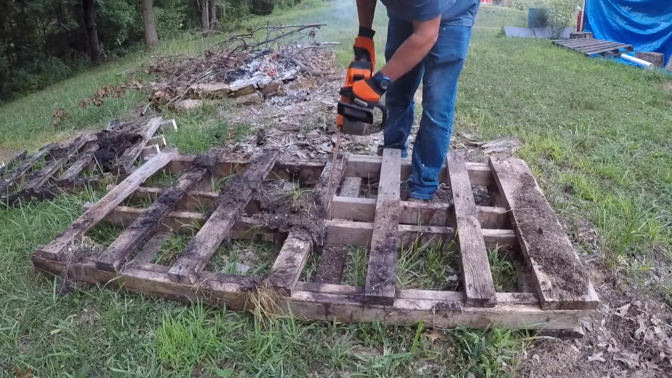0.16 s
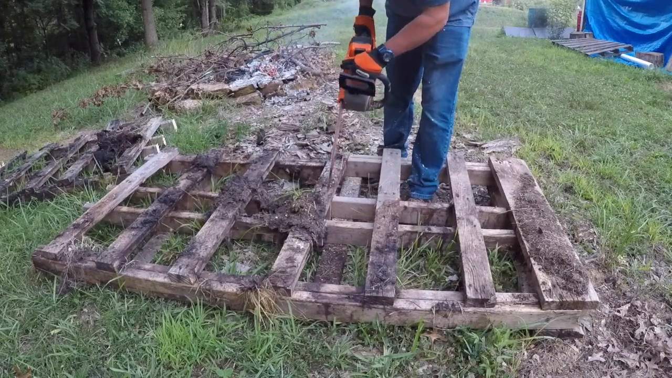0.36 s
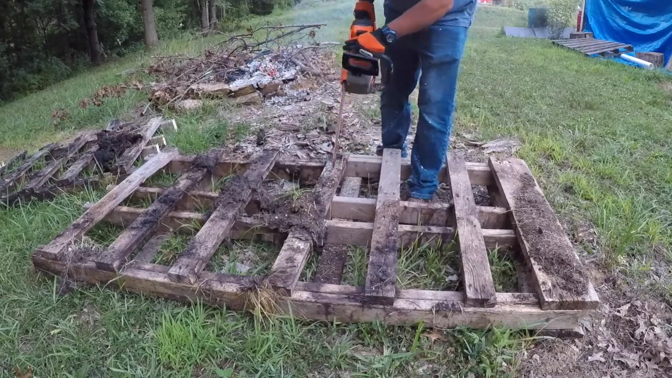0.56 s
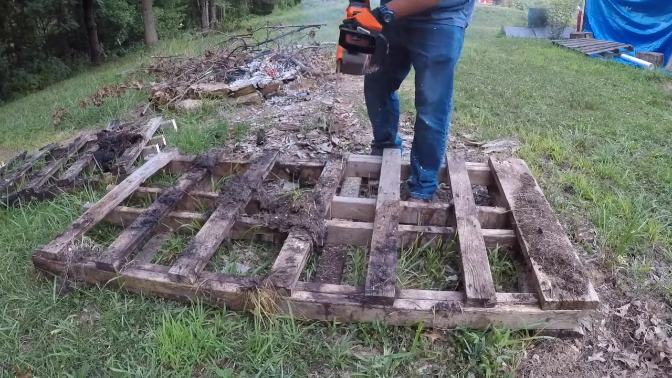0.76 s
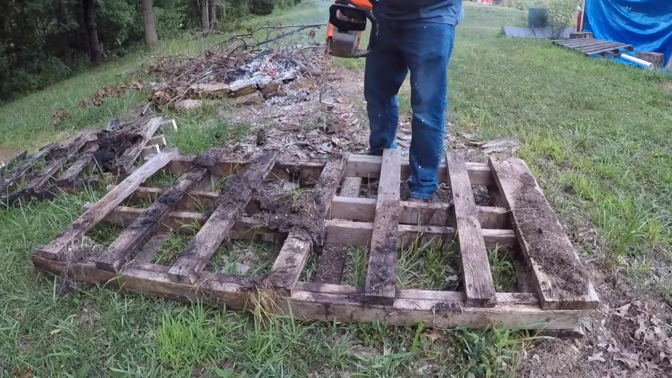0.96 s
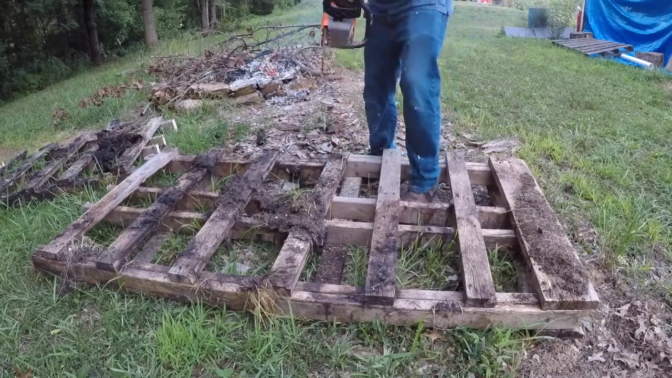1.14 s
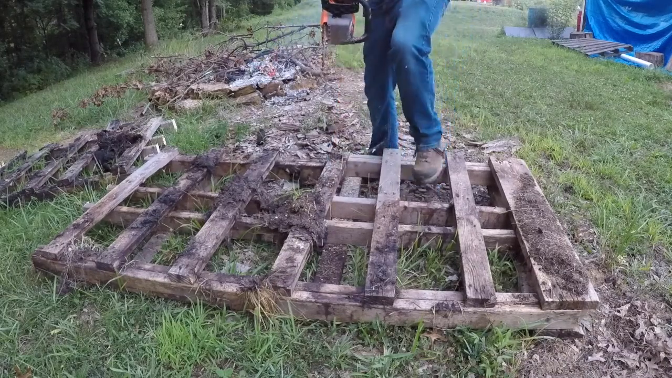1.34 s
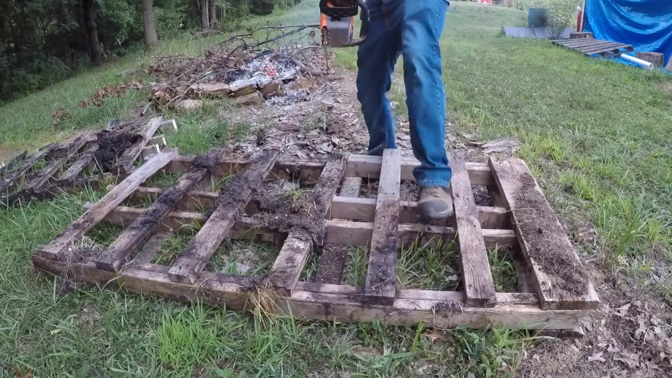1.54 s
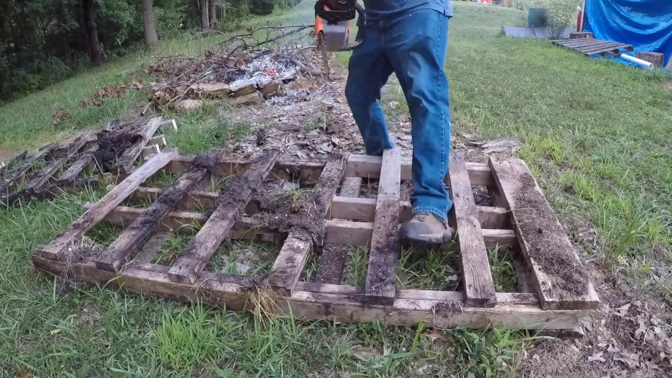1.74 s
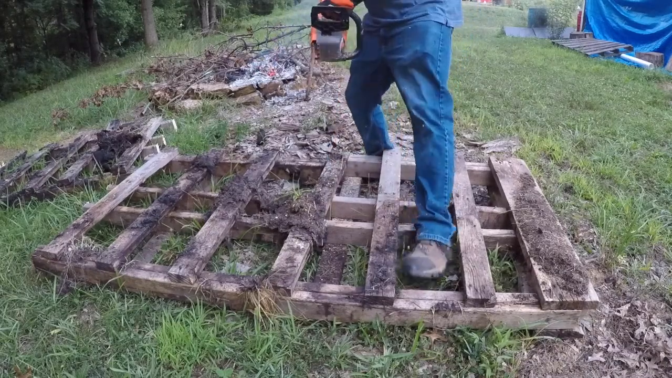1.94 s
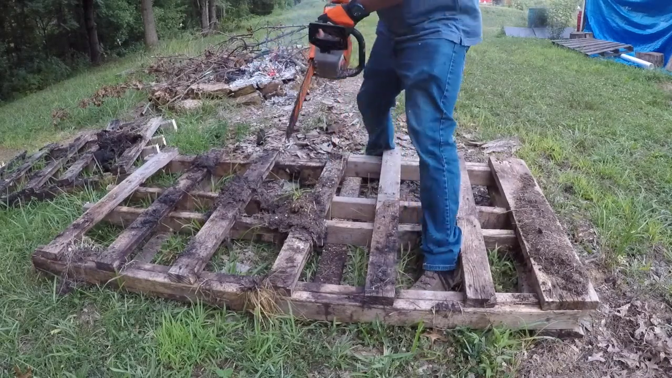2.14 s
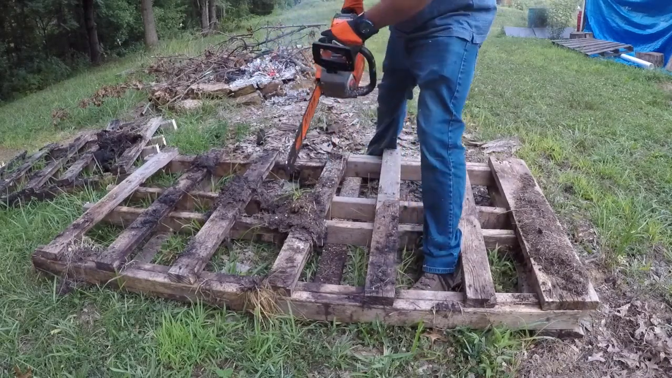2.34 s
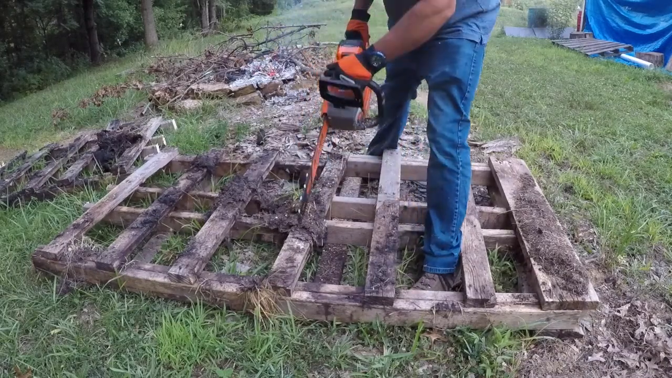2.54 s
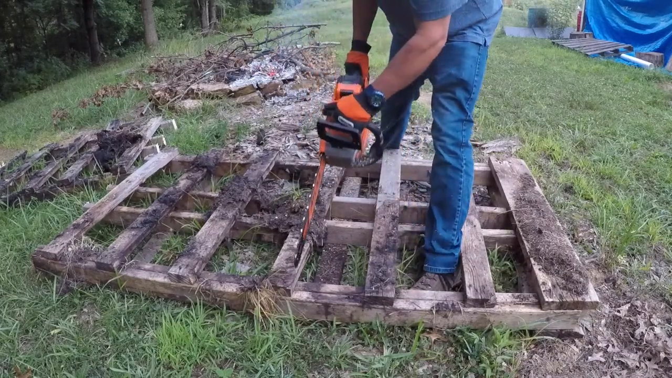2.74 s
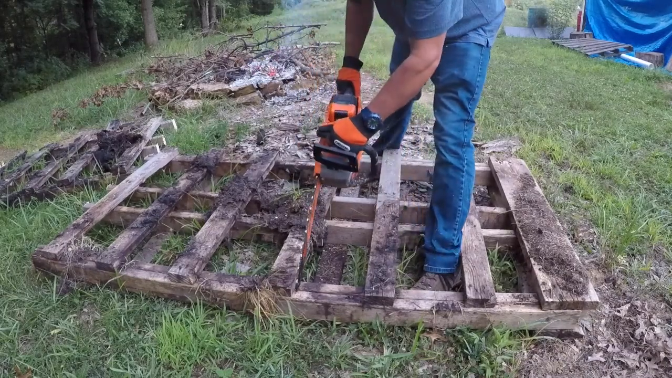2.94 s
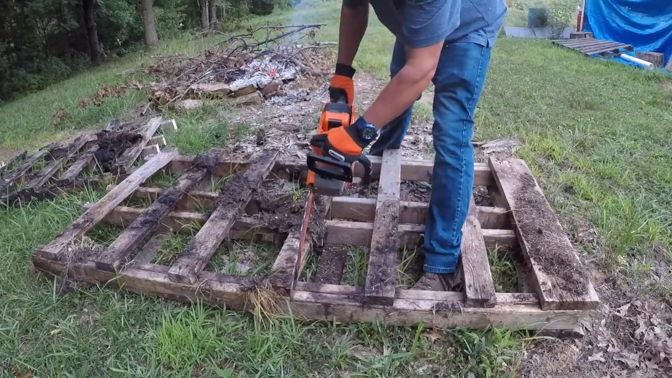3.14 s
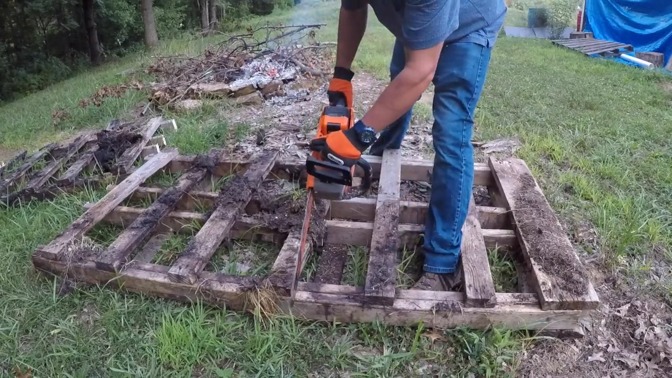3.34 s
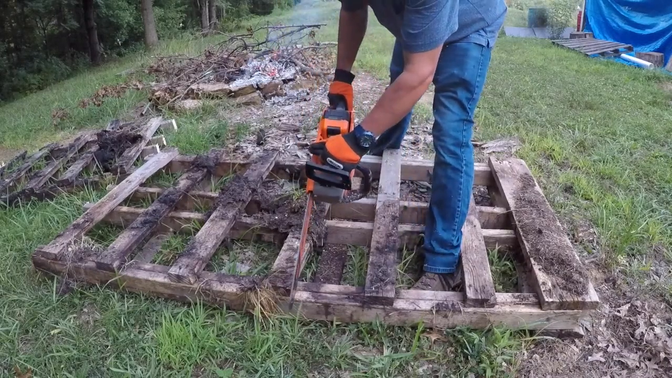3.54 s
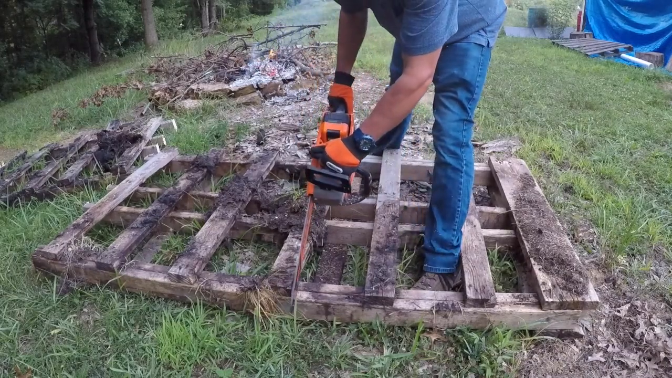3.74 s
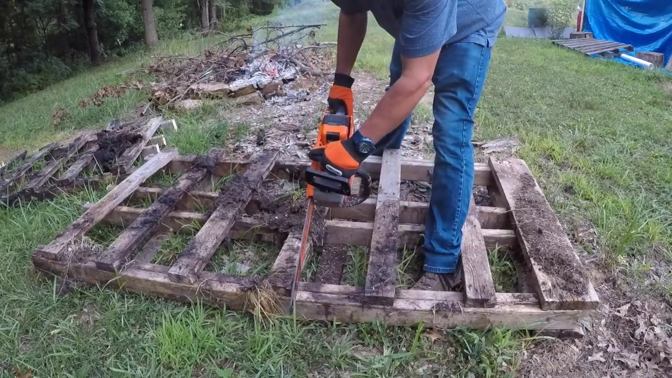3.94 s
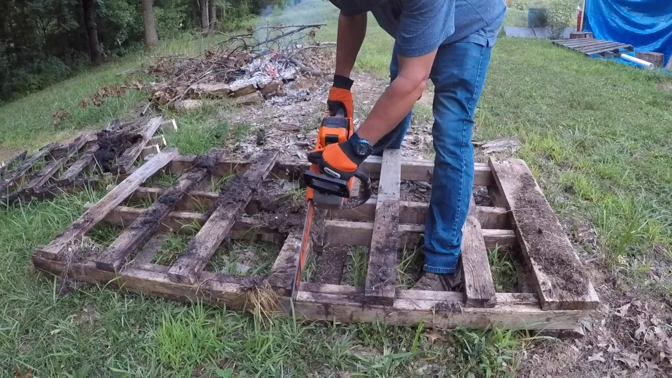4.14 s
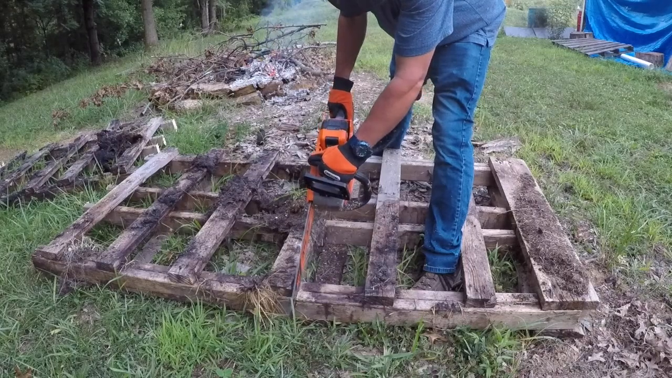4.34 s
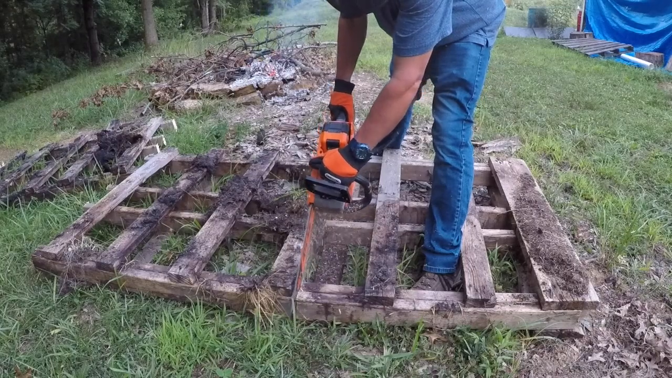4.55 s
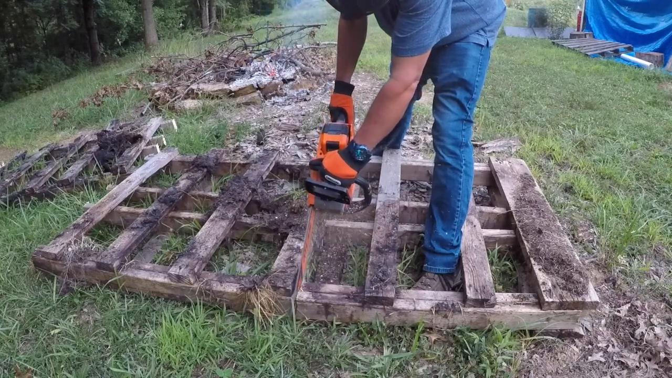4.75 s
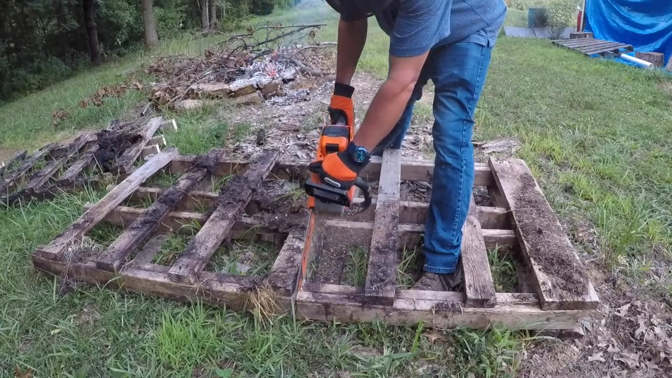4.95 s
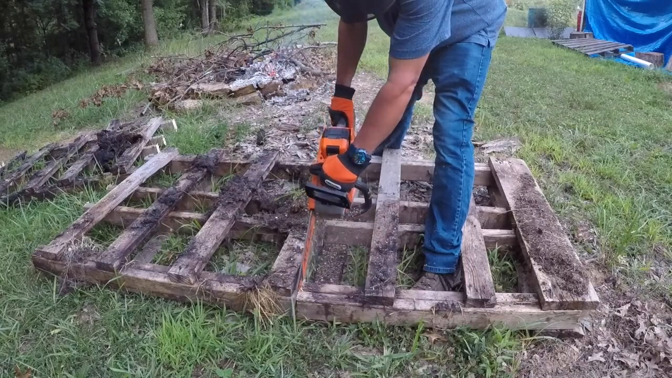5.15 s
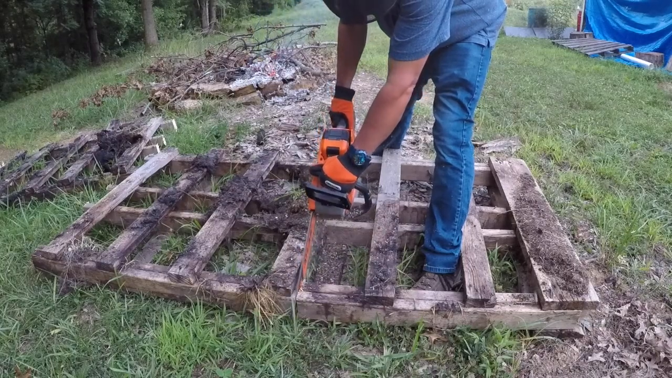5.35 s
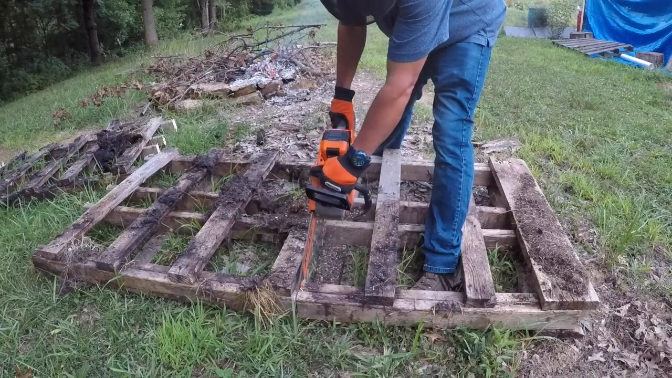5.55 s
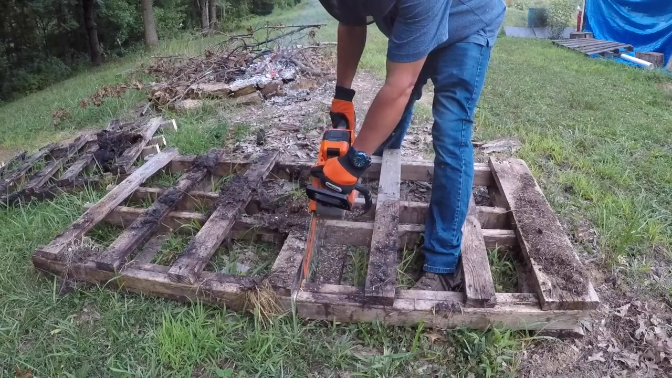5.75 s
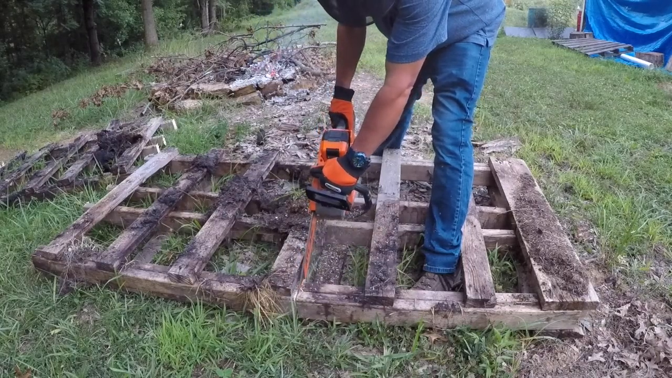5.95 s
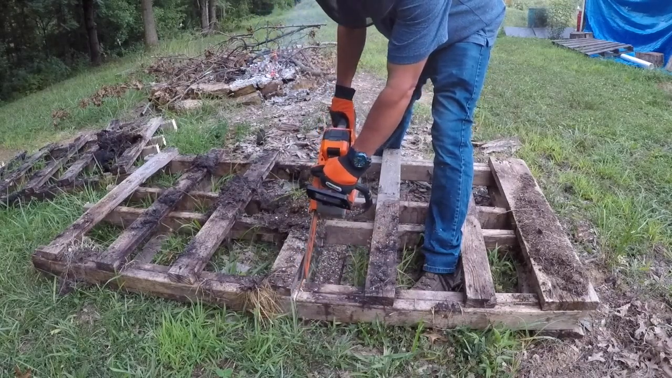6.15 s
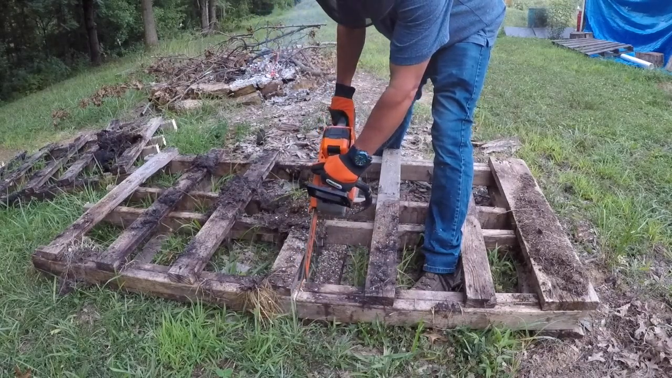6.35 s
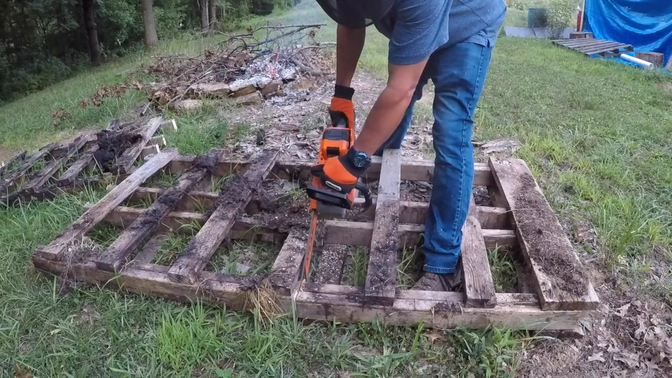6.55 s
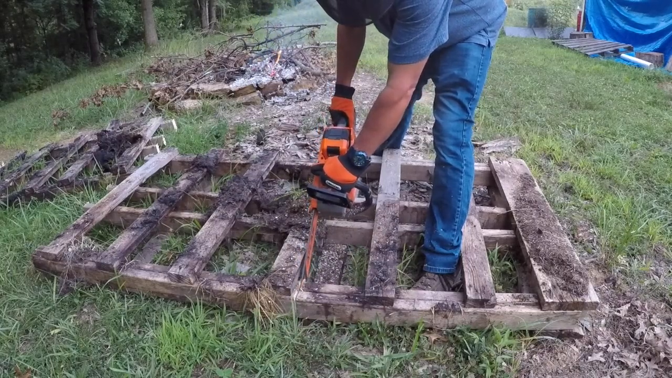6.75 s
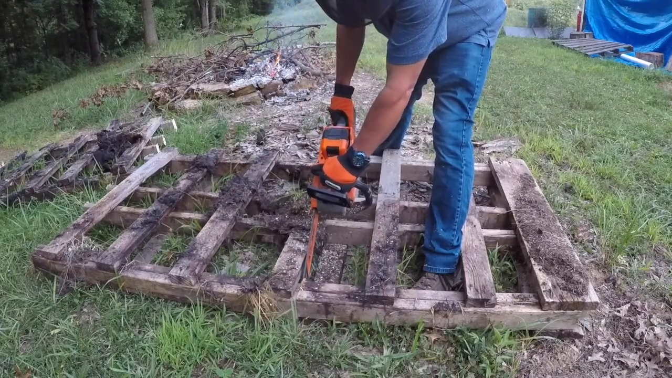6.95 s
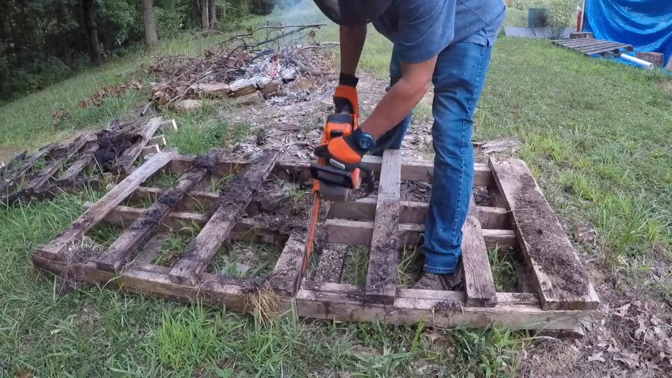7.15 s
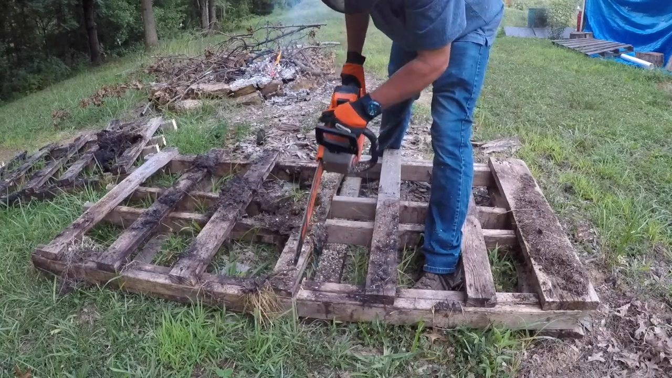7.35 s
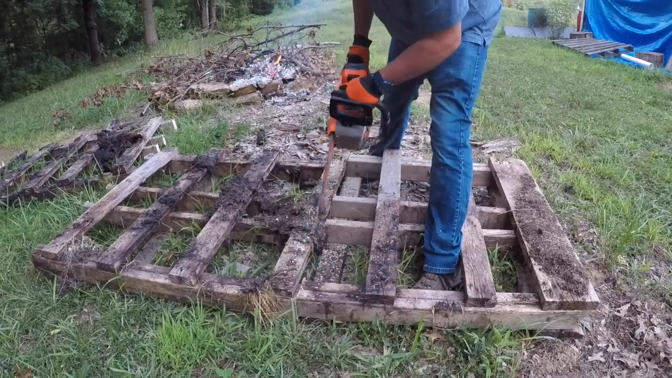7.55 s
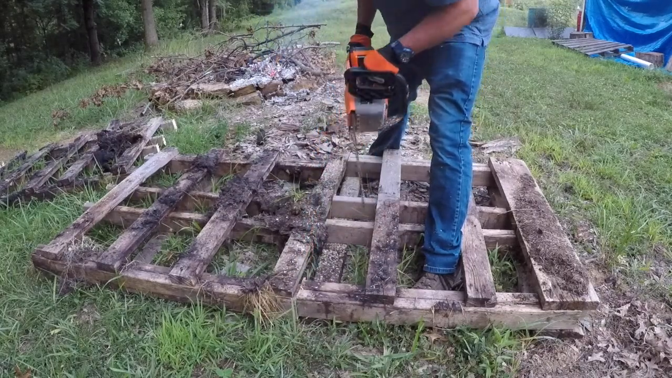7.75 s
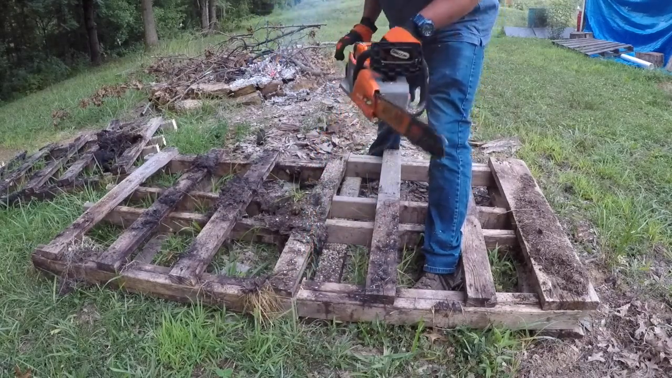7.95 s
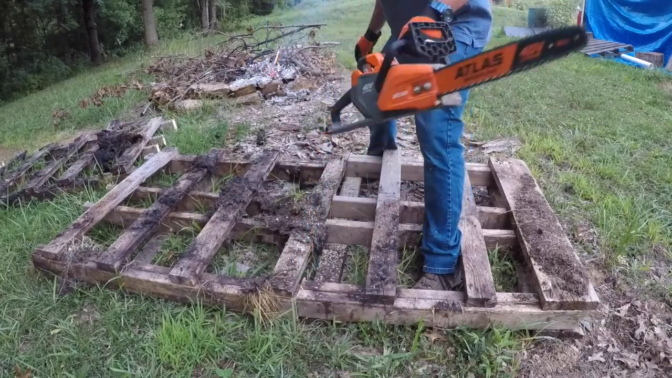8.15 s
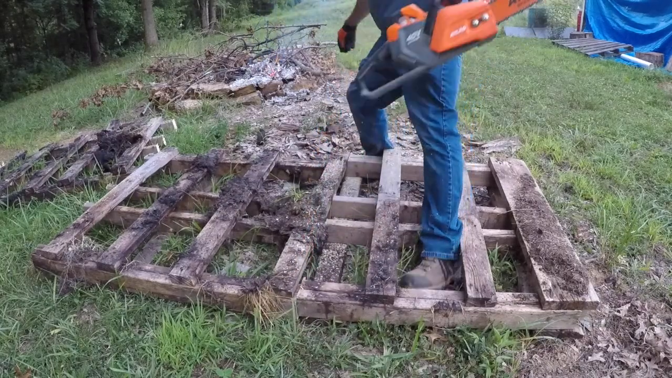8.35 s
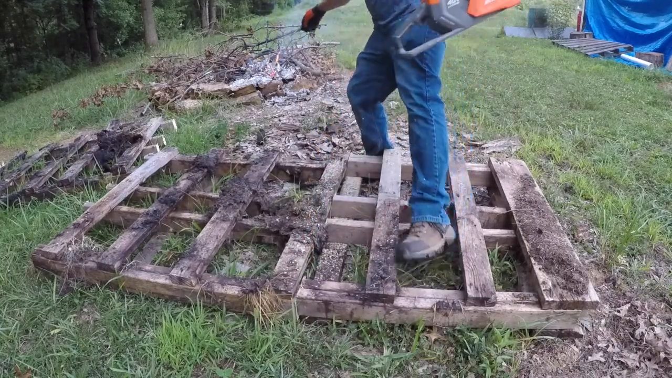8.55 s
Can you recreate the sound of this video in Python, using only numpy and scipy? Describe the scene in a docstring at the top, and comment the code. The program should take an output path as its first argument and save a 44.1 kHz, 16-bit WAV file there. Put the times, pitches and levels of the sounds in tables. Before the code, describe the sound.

A cordless chainsaw finishes a cut in a wooden pallet, coasts and stops dead. Boots thud and scuff softly over the boards and grass. The saw restarts with a brief high squeal, whines up to speed and rips through the wood for about three seconds, then winds down with a rattling chain and stops. It is heard from nearby, over very quiet outdoor air.

```python
"""A cordless chainsaw finishes a cut in a wooden pallet, coasts and stops dead; it restarts with a
squeal, spins up, rips through the slats and coasts to a stop again. Its chain is a train of impacts
coloured by bar and wood, and its sprocket adds tones at multiples of the rotation rate.
Between the cuts a boot steps across the boards and excites their modes.
Behind it all lie quiet outdoor air, a faint far hum and a thin insect trill."""
import sys
import numpy as np
from scipy import signal
from scipy.fft import rfft, irfft, next_fast_len
from scipy.io import wavfile
from scipy.ndimage import uniform_filter1d, map_coordinates

SR = 44100
rng = np.random.default_rng(int(sys.argv[2]) if len(sys.argv) > 2 else 0)


def generate_wav(sig):
    """Save sig (samples, or channels by samples) to the path in sys.argv[1] as 16-bit PCM at SR."""
    pcm = np.round(np.clip(np.atleast_2d(sig).T, -1, 1) * 32767).astype(np.int16)
    wavfile.write(sys.argv[1], SR, pcm)


N = 379260
TIME = np.arange(N) / SR


def amp(db):
    """Decibels to amplitude ratio."""
    return np.exp(np.asarray(db) / 20 * np.log(10))


def unit(x):
    """Normalisation to rms 1."""
    return x / np.sqrt(np.mean(x ** 2) + 1e-20)


def curves(rows):
    """Linear interpolation, per sample, of each column after the time."""
    times, *columns = np.transpose(rows)
    return [np.interp(TIME, times, column) for column in columns]


def gain_at(hz, spectrum):
    """Gain of a (frequency [Hz], level [dB]) curve, interpolated in log frequency."""
    frequencies, db = np.transpose(spectrum)
    return amp(np.interp(np.log(hz), np.log(frequencies), db))


def add(track, start, sound):
    """Superposition of a sound on a track, from start [s]."""
    part = track[max(round(start * SR), 0):][:len(sound)]
    part += sound[:len(part)]


def noise():
    """White noise of rms 1."""
    return rng.standard_normal(N)


def wobble(rate):
    """Smooth random modulation with rate knots a second."""
    knots = rng.standard_normal(int(N * rate / SR) + 4)
    at = np.arange(0, len(knots) - 1, 1 / 8)
    return np.interp(TIME * rate, at, map_coordinates(knots, [at], order=2))


def filtered(x, response):
    """Zero-phase filtering by a function of frequency."""
    size = next_fast_len(N + 8192)
    return irfft(rfft(x, size) * response(np.fft.rfftfreq(size, 1 / SR)), size)[:N]


def narrow(hz, width_hz):
    """Narrow-band noise of rms 1: one randomly driven resonance."""
    return unit(filtered(noise(), lambda f: 1 / (1 + ((f - hz) / width_hz) ** 2)))


def coloured(x, spectrum, size=4096):
    """Convolution with a minimum-phase body of unit energy: only the spectrum's shape counts."""
    gain = gain_at(np.fft.rfftfreq(size, 1 / SR) + 1, spectrum)
    cepstrum = irfft(np.log(np.maximum(gain, 1e-6)))
    cepstrum[1:size // 2] *= 2
    cepstrum[size // 2 + 1:] = 0
    ring = irfft(np.exp(rfft(cepstrum)))
    return signal.oaconvolve(x, ring / np.linalg.norm(ring))[:N]


# spectrum of the open air: (frequency [Hz], relative level [dB])
AIR_SPECTRUM = [(12, -34), (20, -5), (81, -22), (119, -8), (153, -14.5), (233, -17.5), (291, -26),
                (654, -24), (3790, -37), (10100, -41), (11600, -46), (14500, -42.5), (15700, -51.5)]

def outdoors(hum_hz=122, insect_hz=7720):
    """Ambient noise: broadband air, a modulated far hum and a narrow-band insect trill."""
    hum = amp(-80 + 3 * wobble(6)) * np.sin(2 * np.pi * hum_hz * TIME + 1.2 * wobble(17))
    trill = amp(-83) * narrow(insect_hz, width_hz=110)
    return amp(-66.5) * coloured(noise(), AIR_SPECTRUM) + hum + trill


# swishes: (peak time [s], 20 dB fade time, sign ignored [s], frequency [Hz], width [Hz], level [dB])
SCUFFS = [(1.085, .05, 1100, 350, -68), (1.435, -0.07, 1400, 600, -67), (1.68, -0.04, 1900, 450, -67),
          (2, -0.04, 950, 300, -58), (2.06, 0.08, 450, 220, -56.5), (2.17, 0.12, 1800, 250, -67.5),
          (2.245, 0.05, 613, 110, -61.5), (2.4, 0.22, 555, 200, -67.5), (2.63, 0.02, 1200, 600, -66.5),
          (2.925, -0.08, 3200, 1800, -66.5)]

def scuffs():
    """Sliding friction: soles and cloth drag over boards and grass in grainy bands of noise."""
    swishes = sum(amp(db - 20 * np.minimum(((TIME - peak) / fade) ** 2, 10)) * narrow(hz, width)
                  for peak, fade, hz, width, db in SCUFFS)
    return swishes * unit(amp(2.2 * wobble(250)))


# spectra of brushed grass and the loaded pallet: (frequency [Hz], relative level [dB])
GRASS_SPECTRUM = [(150, -35.5), (250, -6), (379, -7), (491, -8), (545, -7.5), (2030, -18.5), (5370, -23.5),
                  (13700, -34), (15700, -34.5)]
THUMP_SPECTRUM = [(12, -39.5), (20, -3), (38, 4.5), (98, 1.5), (150, -5), (195, -9), (300, -13.5),
                  (390, -40), (660, -120)]
# shifts of weight: (peak time [s], thump level [dB], rustle level [dB], 20 dB fade time [s])
STEPS = [(1.02, -75, -63.5, .5), (1.39, -76.5, -67, 0.2), (1.665, -63.5, -64.5, 0.22),
         (1.82, -52.5, -70, 0.76), (1.93, -43.5, -59, 0.23), (2.05, -46.5, -56.5, 0.2949),
         (2.19, -66, -63, 0.9), (2.3, -50, -66, 0.03), (2.44, -62, -69.5, 0.66), (2.72, -60, -69, 0.44),
         (8.12, -71, -60, 1), (8.27, -57, -66.5, 0.05), (8.5, -59, -55, 0.74)]

def steps(rise_share=0.49):
    """Loading and friction: weight comes onto the pallet while boots and cloth brush the grass."""
    thump, brush = np.zeros((2, N))
    for peak, thump_db, rustle_db, fade in STEPS:
        swell = amp(-20 * np.maximum((peak - TIME) / rise_share, TIME - peak) / fade)
        thump = np.maximum(thump, amp(thump_db) * swell)
        brush = np.maximum(brush, amp(rustle_db) * swell)
    rustle = coloured(unit(noise() * amp(3 * wobble(400) + wobble(35))), GRASS_SPECTRUM)
    return brush * rustle + thump * coloured(noise(), THUMP_SPECTRUM)


# the boot's weight landing: (time [s], peak level [dB], frequency [Hz], 60 dB decay time [s])
THUDS = [(1.658, -41, 70, 0.046), (1.738, -43, 555, 0.081), (1.915, -42.5, 48, 0.15),
         (1.984, -31.5, 85, 0.028), (2.03, -36.5, 92.3, 0.2), (2.102, -42, 383.3, 0.13),
         (2.271, -42, 60.4, 0.078), (2.345, -41.5, 62, 0.063), (2.433, -45.5, 150, 0.043),
         (8.226, -48, 58, 0.14), (8.281, -42, 80, 0.045)]

def thuds():
    """Damped free vibration: each heavy contact excites one mode of the pallet."""
    out, t = np.zeros(N), np.arange(SR // 4) / SR
    for start, db, hz, t60 in THUDS:
        add(out, start, amp(db - 60 * t / t60) * np.sin(2 * np.pi * hz * t))
    return out


# modes of a slat: (frequency [Hz], bandwidth [Hz], relative level [dB])
SLAT_MODES = [(393, 61, 7.5), (550, 45, 4.5), (1039.5, 38, -5.5), (1268, 31, -21), (1540, 16, -26)]
# spectra of a slat's body, dry wood, and splinters and grit: (frequency [Hz], relative level [dB])
SLAT_SPECTRUM = [(110, -34.5), (180, -7), (269, -3.5), (627, 0.5), (892, -12), (1130, -14.5), (1320, -23.5),
                 (3000, -26.5), (3900, -46.5), (6600, -120)]
CLACK_SPECTRUM = [(500, -30), (1000, 6), (2200, -5), (3500, -9), (7000, -30.5)]
SNAP_SPECTRUM = [(1800, -32.5), (4000, 1.5), (8000, -2.5), (12000, -5), (16000, -9)]
# boot, saw, switch and loose boards, in relative levels: (time [s], knock [dB], clack [dB], snap [dB])
KNOCKS = [(0.018, -19, -21.5, -33), (1.034, -73.5, -53, -52.5), (1.312, -58, -60.5, -70),
          (1.589, -69.5, -55.5, -65.5), (1.659, -59, -59.5, -63.5), (1.730, -42.5, -47.5, -59),
          (1.745, -51, -57, -50), (1.813, -49.5, -56, -68), (1.911, -43, -42, -55),
          (1.919, -43, -48.5, -52), (2.063, -51, -52, -49), (2.078, -60, -63, -59),
          (2.099, -43.5, -47.5, -58.5), (2.506, -60, -50.5, -52.5), (2.669, -56, -54, -68),
          (2.693, -56, -47, -66), (2.778, -62, -56, -74), (8.283, -61.5, -52, -59),
          (8.531, -60.5, -48, -52.5), (8.549, -65, -54, -60)]

def knocks():
    """Impact excitation: a light contact rings the slat's modes, with a thud, a clack and a snap."""
    rings, bodies, clacks, snaps = np.zeros((4, N))
    t = np.arange(SR // 10) / SR
    burst = lambda db, t60: amp(db - 60 * t / t60) * rng.standard_normal(len(t))
    for start, knock_db, clack_db, snap_db in KNOCKS:
        ring = np.zeros(len(t))
        for hz, width, db in SLAT_MODES:
            decay = np.exp(-np.pi * max(width, 25) * t)
            ring += amp(db + rng.normal(0, 2.1)) * decay * np.sin(2 * np.pi * hz * t)
        add(rings, start, amp(knock_db) * ring / np.abs(ring).max())
        add(bodies, start, burst(knock_db - 1.5, t60=0.053))
        add(clacks, start, burst(clack_db - 2.5, t60=0.041))
        add(snaps, start, burst(snap_db + 1.5, t60=0.02))
    wood = rings + coloured(bodies, SLAT_SPECTRUM)
    return wood + coloured(clacks, CLACK_SPECTRUM) + coloured(snaps, SNAP_SPECTRUM)


# resonances of the slat being cut: (time [s], duration [s], frequency [Hz], width [Hz], level [dB])
DRONES = [(0, .0784, 196, 22, -39.5), (0, .0794, 383.7, 22, -25), (3.88, 0.54, 234.7, 22, -43),
          (3.964, .333, 396.3, 22, -30.5), (5.2, .75, 1070, 25, -31), (5.45, .7, 4600, 450, -36.5),
          (6.25, .8, 1052, 18, -33), (6.7, .3, 4300, 300, -38)]

def drones(fade_s=0.04):
    """Forced vibration: the cutters shake the slat, which hums in narrow resonances."""
    out = np.zeros(N)
    for start, duration, hz, width, db in DRONES:
        gate = np.clip(1 + np.minimum(TIME - start, start + duration - TIME) / fade_s, 0, 1)
        out += amp(db) * narrow(hz, width) * gate
    return out


# hard spots in the wood: (time [s], relative level [dB], frequency [Hz], 60 dB decay time [s])
SNAGS = [(3.79, -11, 9126, .023), (3.799, -16.5, 5912, .04), (7.075, -15.5, 6840, .04),
         (7.087, -7.5, 6650, 0.025), (7.932, -24.5, 9090, .016)]

def snags(q=2.2):
    """Transient excitation: a cutter catches and gives a bright zip of decaying noise."""
    out, t = np.zeros(N), np.arange(SR // 10) / SR
    for start, db, hz, t60 in SNAGS:
        band = signal.lfilter(*signal.iirpeak(hz, q, SR), rng.standard_normal(len(t)))
        add(out, start, amp(db - 7.5 - 60 * t / t60) * unit(band))
    return out


# resonances of the jolted drive: (frequency [Hz], width [Hz], level [dB], 60 dB decay time [s])
DRIVE_MODES = [(1020, 216, -40.5, 0.054), (3970, 400, -47.5, .04), (6950, 400, -50, .03),
               (8450, 400, -46, .03)]

def motor_start(start=2.946, end=3.135, switch_hz=7850, split_hz=240, ping_hz=3252):
    """Sidebands and impulse response: the switching squeal splits; a current kick rings the drive."""
    out = np.zeros(N)
    t = np.arange(round((end - start) * SR)) / SR
    split = np.pi * split_hz * t ** 2 / t[-1]
    carrier = 2 * np.pi * switch_hz * t + 0.6 * wobble(400)[:len(t)]
    upper = 2 * (t / t[-1]) ** 3 * np.sin(carrier + split)
    lower = 0.67 * np.sin(carrier - split)
    fizz = amp(-58) * narrow(switch_hz, width_hz=346)[:len(t)]
    squeal = amp(-50) * (upper + lower) + fizz
    add(out, start, squeal * np.clip((end - start - t) / 0.0065, 0, 1))

    t = np.arange(SR // 2) / SR
    rotor_ping = amp(-43 - 60 * t / 0.17) * np.sin(2 * np.pi * ping_hz * t)
    rotor_hum = amp(-59) * (1 - t / t[-1]) * narrow(ping_hz, width_hz=90)[:len(t)]
    clunk = sum(amp(db - 60 * t / t60) * narrow(hz, width)[:len(t)]
                for hz, width, db, t60 in DRIVE_MODES)
    attack = 1 - np.exp(-t / 0.00091)
    add(out, start - 0.001, (rotor_ping + rotor_hum + clunk) * attack)
    return out


CRAWL_SPEED, PART_SPEED = 9, 101.4  # the soft start's floor and plateau [turns/s]
ACCELERATION = 224  # slope of the soft start [turns/s^2]

def run_speed(held, start, friction, crawl_s=0.144, knee=4):
    """Rotational dynamics: soft start, held speed, then coasting against friction and air drag."""
    (cut_start, _), (release, release_speed) = held[0], held[-1]
    ramp = np.hypot(ACCELERATION * np.maximum(TIME - start - crawl_s, 0), CRAWL_SPEED)
    rising = ramp / (1 + (ramp / PART_SPEED) ** knee) ** (1 / knee)
    drag_speed = 101  # air drag equals chain friction here [turns/s]
    coast_s = np.maximum(TIME - release, 0)
    slowing = np.arctan(release_speed / drag_speed) - friction / drag_speed * coast_s
    coasting = np.maximum(drag_speed * np.tan(np.maximum(slowing, 0)), CRAWL_SPEED)
    return np.select([TIME < cut_start, TIME < release], [rising, curves(held)[0]], coasting)


# sprocket speed in each cut, until the trigger is let go: (time [s], speed [turns/s])
FIRST_CUT_SPEED = [(0, 128), (.1, 125.3), (.2, 121), (.23, 119)]
SECOND_CUT_SPEED = [(4, 100), (4.13, 99.6), (4.28, 100.6), (4.4, 117.5), (4.49, 134.7), (4.54, 140.1),
                    (4.62, 142), (4.9, 141.6), (5.5, 139), (5.9, 139.6), (6.04, 141), (6.2, 149),
                    (6.32, 152.5), (6.5, 151.7), (6.62, 150), (6.89, 149.4), (7.05, 152.5), (7.14, 141.5),
                    (7.26, 135.3), (7.33, 127.1)]
# runs: (trigger time [s], brake time [s], friction [turns/s^2], mesh gain [dB], octave gain [dB])
RUNS = [(-2, .945, 72.5, 2.5, -7), (2.946, 8.093, 80.5, -2, -3.5)]

def drive(ease_s=0.46, slack_s=0.095, brake_db_per_s=897.5):
    """Attack and decay: the chain takes up slack, the motor's pull eases, the brake ends the sound."""
    speed = np.full(N, float(CRAWL_SPEED))
    pull, running, mesh_db, octave_db = np.zeros((4, N))
    for held, run in zip([FIRST_CUT_SPEED, SECOND_CUT_SPEED], RUNS):
        start, brake, friction, run_mesh_db, run_octave_db = run
        begun, release = TIME >= start, held[-1][0]
        speed[begun] = run_speed(held, start, friction)[begun]
        mesh_db[begun], octave_db[begun] = run_mesh_db, run_octave_db
        pull += begun * np.clip((release - TIME) / ease_s, 0, 1)
        take_up = 1 - np.exp(-np.maximum(TIME - start, 0) / slack_s)
        running += take_up * amp(-brake_db_per_s * np.clip(TIME - brake, 0, 0.5))
    return speed, pull, running, mesh_db, octave_db


# the bar's response to tooth meshing: (frequency [Hz], relative level [dB])
MESH_RESPONSE = [(80, -54), (275, -49), (350, -31), (460, -28.5), (525, -23), (580, -21), (680, -29),
                 (750, -37), (840, -35.5), (930, -37), (1060, -35), (1190, -24), (1290, -31), (1400, -27),
                 (1520, -29.5), (1690, -35), (1800, -35.5)]
TEETH = 6

def mesh_levels(speed, pull, running, mesh_db, octave_db):
    """Resonance: the mesh tone and its octave swell as they sweep through the bar's peaks."""
    doublings = np.log2(speed / PART_SPEED)
    strength = running * amp(5 * doublings)
    mesh = strength * amp(mesh_db + 2.5 * pull) * gain_at(TEETH * speed, MESH_RESPONSE)
    pull_db = pull * (5.5 + 5 * np.minimum(doublings, 0))  # the octave comes in near part speed
    octave = strength * amp(octave_db + pull_db) * gain_at(2 * TEETH * speed, MESH_RESPONSE)
    accelerating = np.clip(np.gradient(speed) * SR / ACCELERATION, 0, 1)
    torque_hum = amp(-34.5) * running * (speed / PART_SPEED) ** 1.8 * accelerating
    return mesh + torque_hum, octave


# shaft harmonics, relative to the rattle: (multiple, free level [dB], cutting level [dB])
SHAFT_HARMONICS = [(1, -19, -22), (2, -18, -9), (3, -20, -30), (4, -10, -22), (5, -11, -26),
                   (7, -14.5, -20), (8, -15, -13), (9, -12, -22), (10, -17, -30), (11, -14, -32),
                   (13, -16, -25), (14, -20, -20), (15, -18, -29), (16, -21, -24), (17, -22, -18),
                   (18, -10.5, -36), (20, -20, -34), (24, -9.5, -26), (26, -19, -30), (30, -25, -20)]
# how well the housing radiates them: (frequency [Hz], gain [dB])
HOUSING_RESPONSE = [(30, -34), (100, -13), (200, -20), (290, -8), (400, -.5), (520, 4), (800, -1),
                    (1100, 2), (1220, 3), (1400, 4), (1530, 3), (1750, -8), (1830, -12), (1975, 0),
                    (2130, -5), (2400, -8), (2570, 3), (2750, -7), (3000, -5), (3400, 0), (3900, -6),
                    (4500, -.5)]

def sprocket(turns, mesh, octave, rattle, bite):
    """Periodic forcing: teeth mesh with the chain, the shaft adds harmonics, the load shakes both."""
    angle = 2 * np.pi * turns + 0.014 * wobble(50)
    meshing = amp(bite * (2.6 * wobble(4) - 2.5) + 1.1 * wobble(45)) * mesh * np.sin(TEETH * angle)
    meshing += amp(bite * (2.2 * wobble(6) - 4) + 2.2 * wobble(50)) * octave * np.sin(2 * TEETH * angle)
    whine = np.zeros(N)
    for multiple, free_db, cutting_db in SHAFT_HARMONICS:
        level_db = free_db + (cutting_db - free_db) * bite + 3 * wobble(14) - 2
        whine += amp(level_db) * np.sin(multiple * angle + rng.uniform(0, 2 * np.pi))
    radiated = filtered(rattle * whine, lambda hz: gain_at(hz + 1, HOUSING_RESPONSE))
    return np.sqrt(2) * (meshing + radiated)


# chain layers: (level at part speed [dB], gain per speed doubling [dB], in wood [dB], under pull [dB])
RATTLE_LAW = (-28.4, 4, 4.1, 2)
RASP_LAW = (-32, 6.5, 4.5, -0.81)
TICKING_LAW = (-29.5, 9, -6, -0.74)
SHUDDER_LAW = (-67, 9, 16.5, 0)

def chain_levels(speed, turns, pull, running, bite, pressure_db, lap_turns=9):
    """Power laws: four layers grow with speed; whip and creep each peak near a speed of their own."""
    doublings = np.log2(speed / PART_SPEED)
    uneven_db = 0.5 * np.sin(2 * np.pi * turns / lap_turns) + 0.33 * wobble(25)

    def level(law, pressure_share):
        db, speed_db, wood_db, pull_db = law
        load_db = wood_db * bite + pull_db * pull + pressure_share * pressure_db
        return running * amp(db + speed_db * doublings + load_db + uneven_db)

    whip_speed, creep_speed = 68, 27  # [turns/s]
    whip = running * (1 - pull) * amp(-34) * np.exp(-(np.log2(speed / whip_speed) / 0.15) ** 2)
    creep = running * pull * amp(-52) * speed / creep_speed * np.exp(1 - speed / creep_speed)
    return (level(RATTLE_LAW, 0.269), level(RASP_LAW, 0.14), level(TICKING_LAW, 0.34),
            level(SHUDDER_LAW, 0.748), whip, creep)


def impacts(passed, scatter, spread_db, decay_s, hiss):
    """Shot noise: each whole count of passed fires an uneven burst over steady rubbing; rms near 1."""
    counts = np.arange(int(passed[-1]))
    late, size = rng.standard_normal((len(counts), 2)).T
    onsets = np.interp(counts + scatter * late, passed, np.arange(N)).astype(int)
    energy = np.bincount(onsets, amp(spread_db * np.clip(size, -2.5, 2.5)) ** 2, N)
    power = signal.lfilter([1], [1, -np.exp(-2 / (decay_s * SR))], energy)
    power /= np.abs(uniform_filter1d(power, size=3000)) + 1e-6
    return noise() * np.sqrt(hiss + (1 - hiss) * np.minimum(power, 9))


def flicker(x, depth_db):
    """Random spectral modulation: drifting patches of colour, a few hundred Hz wide."""
    spectra = signal.stft(x, nperseg=512)[2]
    field = uniform_filter1d(rng.standard_normal(spectra.shape), size=4, axis=0)
    field = uniform_filter1d(field, size=30, axis=1)
    return signal.istft(spectra * amp(depth_db * unit(field)), nperseg=512)[1][:N]


# lag of the chain's glancing echo: (time [s], delay [ms])
ECHO_DELAY = [(0, .26), (.33, 0.21), (.55, 0.23), (.95, 0.25), (3.8, .228), (4.4, .29), (6.9, .25),
              (7.2, .218), (7.35, .21), (7.5, .176), (7.7, 0.15), (7.87, .19)]

def board_echo(x):
    """Reflection off the board: a sweeping colour in the treble as the saw tilts."""
    lag = curves(ECHO_DELAY)[0] * SR / 1000
    return map_coordinates(x, [np.arange(N) - lag], order=3)


# peaks and hollows of the saw's body: (frequency [Hz], bandwidth [Hz], gain [dB])
BODY_RESONANCES = [(536, 45, 2), (765, 100, -1.5), (1056, 41, 1.2), (1212, 52, 1), (1840, 99, -3.5),
                   (1936, 92, 2), (2258, 82, -1.5), (3295, 120, 1), (3594, 180, 0), (8700, 400, -1)]

def saw_body(x):
    """Resonance and antiresonance: the body lifts or lowers narrow bands of the chain's noise."""
    for hz, width, db in BODY_RESONANCES:
        x = x + (amp(db) - 1) * signal.lfilter(*signal.iirpeak(hz, hz / width, SR), x)
    return x


# spectra of bar, scraping and steel, free and in wood: (frequency [Hz], relative level [dB])
BAR_FREE = [(120, -55.5), (200, -29.5), (291, -19), (359, 0), (384, 2), (468, -1), (580, 2.5), (689, -7.5),
            (888, -5.5), (981, -6.5), (1210, 1.5), (1380, -5), (1840, -11.5), (2060, -15), (2800, -16),
            (3640, -52), (6160, -120)]
BAR_IN_WOOD = [(120, -56), (200, -39.5), (285, -12.5), (325, -10.5), (415, -4.5), (458, -9), (546, 3),
               (720, -5.5), (831, -6), (898, -4.5), (1070, 0.2), (1560, -9.5), (1650, -16), (1880, -13.5),
               (2800, -17.5), (3640, -50.5), (6160, -120)]
SCRAPE_FREE = [(1240, -29), (2100, 5.5), (2800, -0.5), (3280, 2), (3800, -5.5), (5080, -2.5), (7010, -7),
               (7590, -20), (8420, -7), (9000, -10.5), (11700, -31.5), (19800, -120)]
SCRAPE_IN_WOOD = [(1240, -39.5), (2100, -1), (2260, -2.5), (2710, -4), (3160, -1.5), (3810, -5.5),
                  (4360, 0), (5110, 0), (5810, -2), (6210, -8.5), (6800, -6.5), (9000, -13), (11700, -30.5),
                  (19800, -120)]
STEEL_FREE = [(4240, -21), (7200, -4), (7710, 1), (8560, -6), (9290, 1), (10700, 1), (12300, 2.5),
              (14600, -5), (15400, -8.5), (15700, -14.5)]
STEEL_IN_WOOD = [(4240, -22.5), (7200, -4), (8870, -3), (9660, 3.5), (11300, -3), (12300, -0.5),
                 (14700, -5), (15300, -7), (15700, -18.5)]
# spectra of one link's click and the shaken board: (frequency [Hz], relative level [dB])
CLICK_SPECTRUM = [(1500, -22), (4000, -12), (8300, -14), (9600, 0), (12500, -1), (15000, -14)]
BOARD_SPECTRUM = [(32, -51.5), (55, -20.5), (83, -12.5), (107, -5), (135, -5.5), (177, -15), (210, -6),
                  (260, -3.5), (340, -33.5), (570, -120)]

def chain(turns, levels, bite, pull, taut_hz=485, taut_db=-7.5, echo_gain=0.17):
    """Source and filter: links slap the bar, cutters tear fibres and shake the board, rivets tick."""
    rattle, rasp, ticking, shudder, whip, creep = levels
    links = TEETH * turns
    cutters = links / 2
    free, cutting = np.sqrt(1 - bite), np.sqrt(bite)
    unevenness = rng.standard_normal(128)  # of the sprocket, repeating on every turn
    buzz = 0.11 * map_coordinates(unevenness, [turns % 1 * len(unevenness)], mode="grid-wrap")
    slaps = impacts(links, scatter=0.22, spread_db=5, decay_s=0.0015, hiss=0.64) + buzz
    tearing = impacts(cutters, scatter=0.36, spread_db=3, decay_s=0.0007, hiss=0.56)
    scraping = impacts(2 * links, scatter=0.39, spread_db=3.5, decay_s=0.0012, hiss=0.53) + buzz
    ripping = impacts(cutters, scatter=0.57, spread_db=5.5, decay_s=0.0014, hiss=0.66) + buzz
    # each link ticks twice: at the sprocket and at the bar's nose
    ticks = impacts(2 * links, scatter=0.31, spread_db=9.5, decay_s=0.00027, hiss=0.22)
    # a coasting chain whips on the bar; a creeping one clicks link by link
    lashes = impacts(2 * turns, scatter=0.16, spread_db=5, decay_s=0.002, hiss=0.1)
    clicks = impacts(links, scatter=0.25, spread_db=3.5, decay_s=0.0012, hiss=0.05)

    bar = coloured(slaps, BAR_FREE)
    bar_bass = filtered(bar, lambda hz: np.exp(-(hz / taut_hz) ** 6))
    bar += (amp(taut_db * pull) - 1) * bar_bass  # a taut chain slaps less in the bass
    low = rattle * (free * bar + cutting * coloured(tearing, BAR_IN_WOOD))
    middle = rasp * (free * coloured(scraping, SCRAPE_FREE) + cutting * coloured(ripping, SCRAPE_IN_WOOD))
    high = ticking * (free * coloured(ticks, STEEL_FREE) + cutting * coloured(tearing, STEEL_IN_WOOD))
    high += whip * coloured(lashes, STEEL_FREE) + creep * coloured(clicks, CLICK_SPECTRUM)
    treble = middle + high
    treble = flicker(treble + echo_gain * free * board_echo(treble), depth_db=1.4624)
    chatter = amp(0.36 * bite * wobble(70))  # the bar hops in the kerf
    return chatter * saw_body(low + treble) + shudder * coloured(noise(), BOARD_SPECTRUM)


# the bar in the wood: (time [s], depth of bite [0-1], pressure on the board [dB])
CUT_LOAD = [(0, .87, 11), (.07, .7, 9), (.11, 0.07, 0), (3.75, 0.14, 0.5), (3.98, 0.4, 4.5), (4.3, .75, 10),
            (4.5, 0.82, 3), (6, 0.99, 3.5), (6.3, 0.79, -9), (6.6, 0.98, -4.5), (7.05, .87, -4.5),
            (7.14, 0.3, 2), (7.5, 0.02, 2.5)]

def chainsaw():
    """Coupled sources: one rotation times chain and sprocket; speed, pull and load set their levels."""
    speed, pull, running, mesh_db, octave_db = drive()
    turns = np.cumsum(speed) / SR
    bite, pressure_db = curves(CUT_LOAD)
    levels = chain_levels(speed, turns, pull, running, bite, pressure_db)
    mesh, octave = mesh_levels(speed, pull, running, mesh_db, octave_db)
    return chain(turns, levels, bite, pull) + sprocket(turns, mesh, octave, rattle=levels[0], bite=bite)


def scene():
    """Superposition of the saw, its user and the outdoor air."""
    sawing = chainsaw() + motor_start() + snags() + drones()
    return (sawing + knocks() + thuds() + steps() + scuffs() + outdoors())[None]


def record(dry):
    """Band limiting: an ideal low-pass filter at 15.6 kHz."""
    return filtered(dry[0], lambda hz: hz < 15600)[None]


dry = scene()
out = record(dry)
generate_wav(out)
```